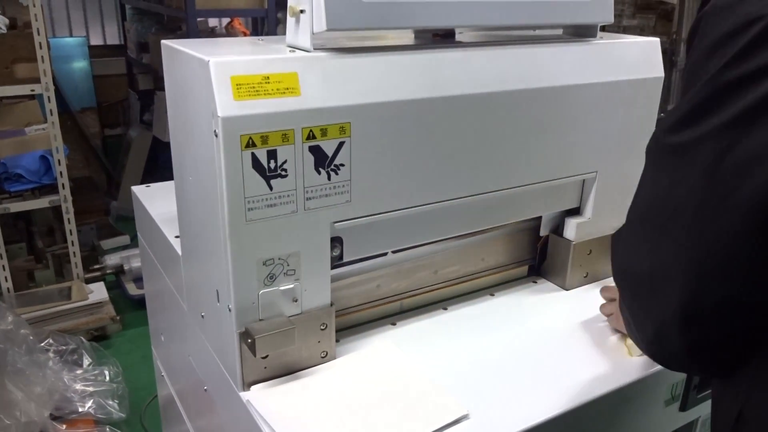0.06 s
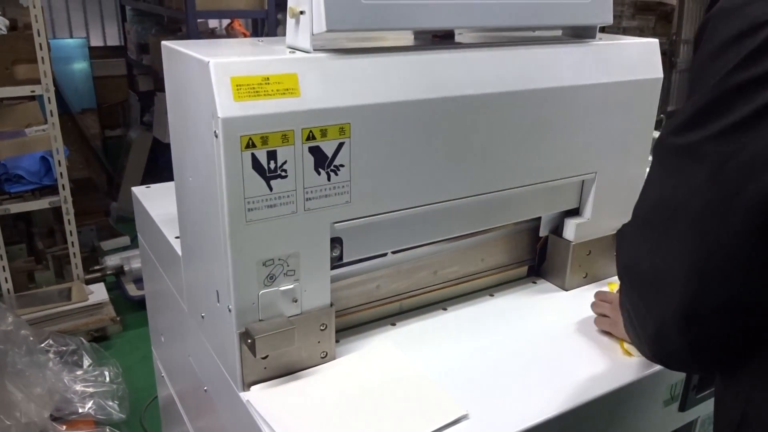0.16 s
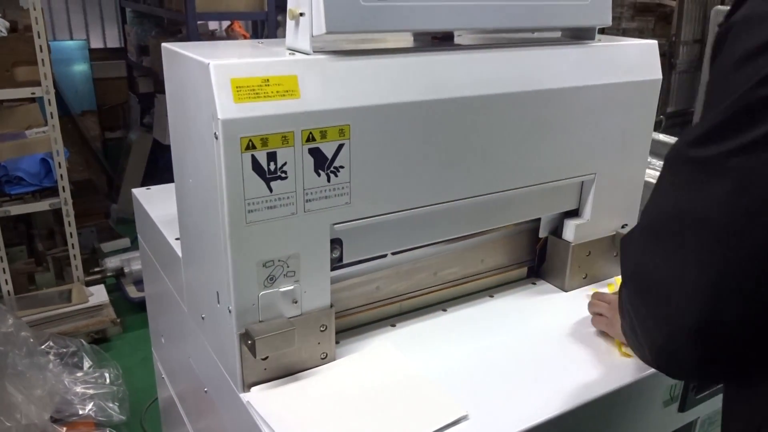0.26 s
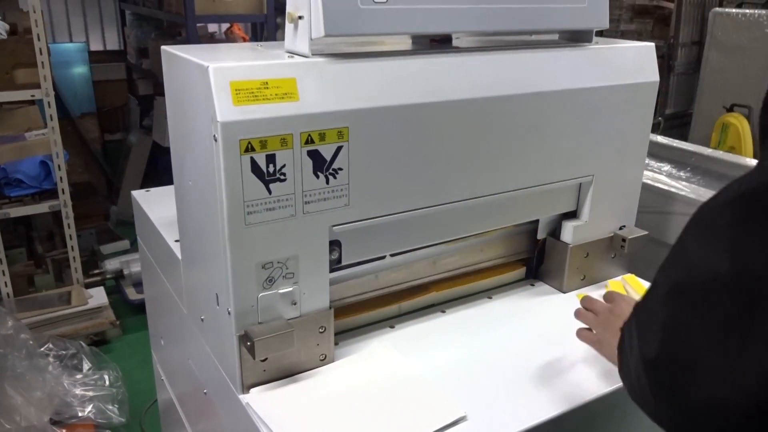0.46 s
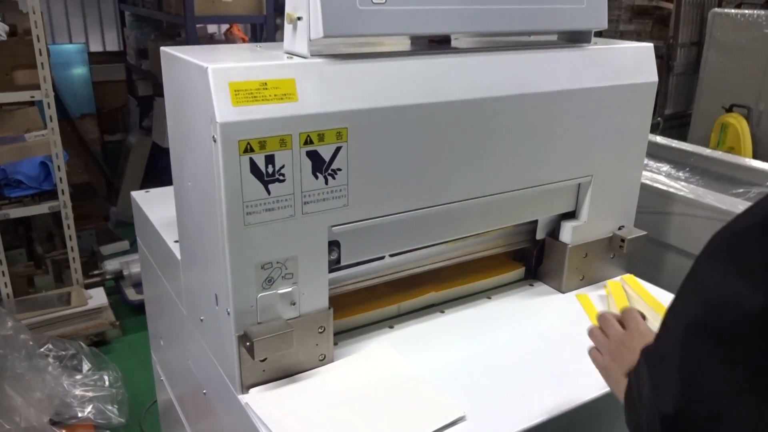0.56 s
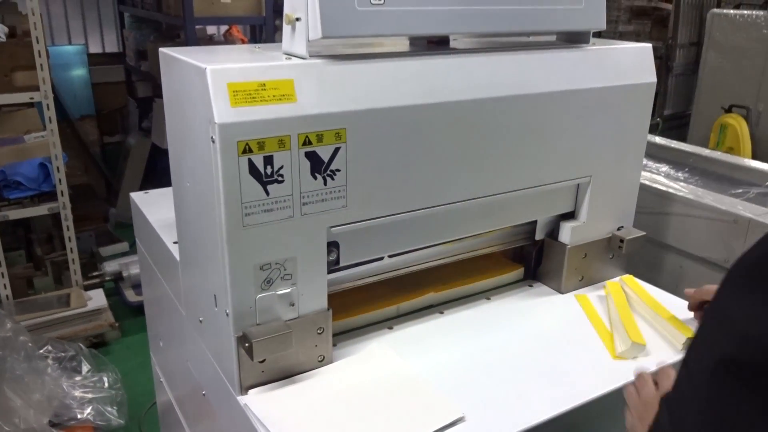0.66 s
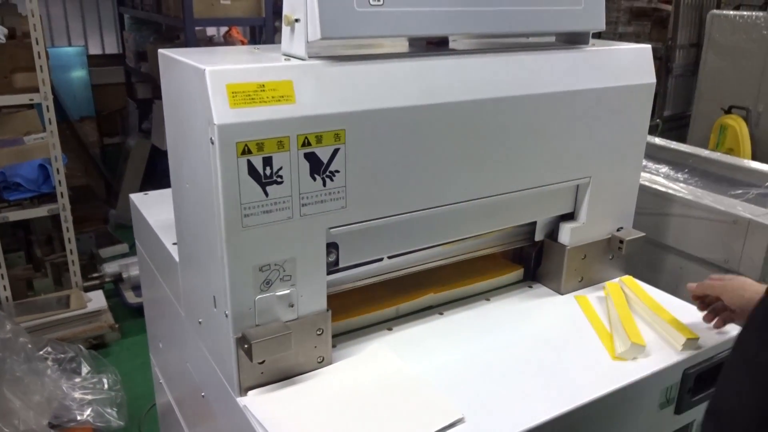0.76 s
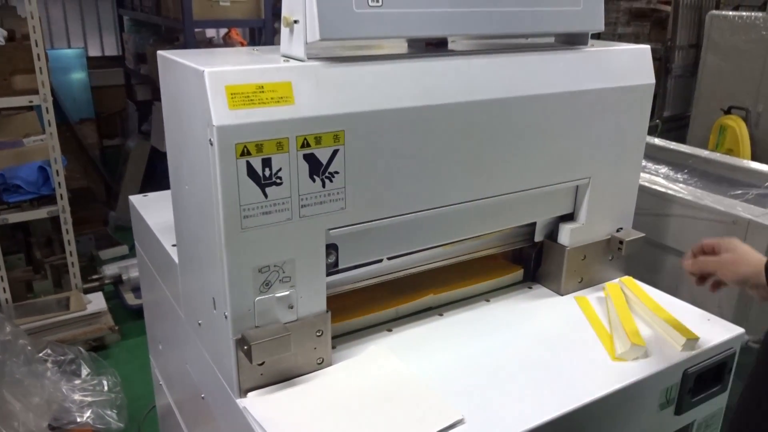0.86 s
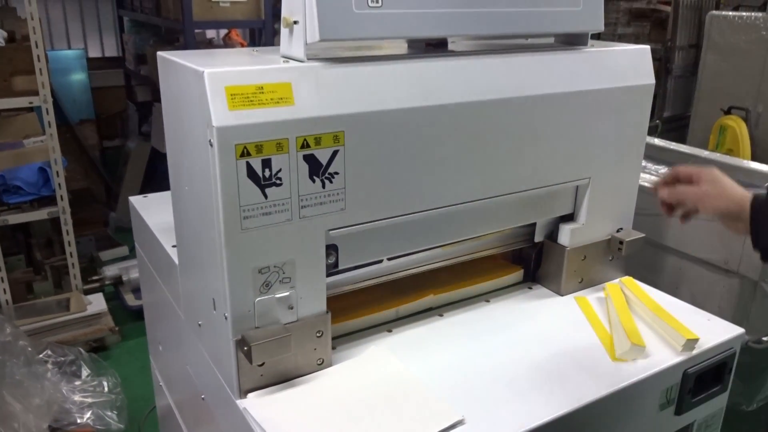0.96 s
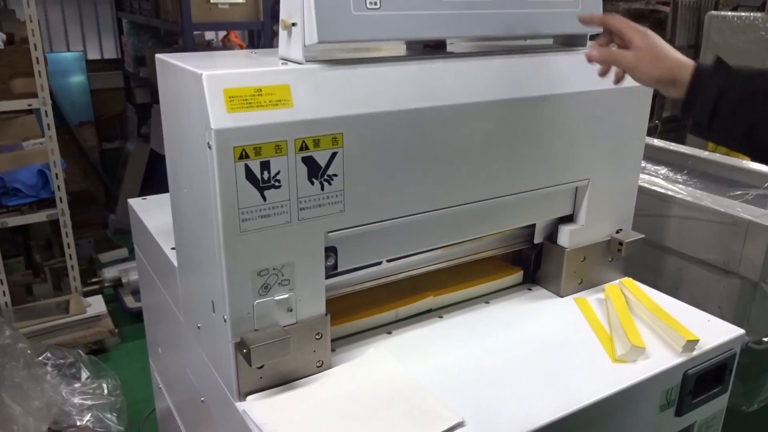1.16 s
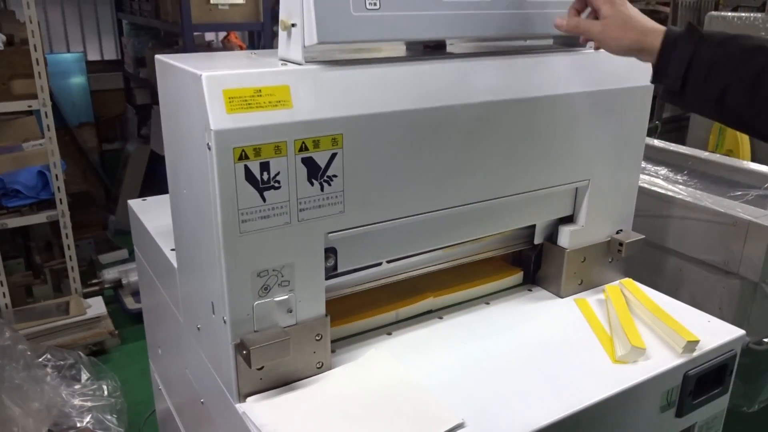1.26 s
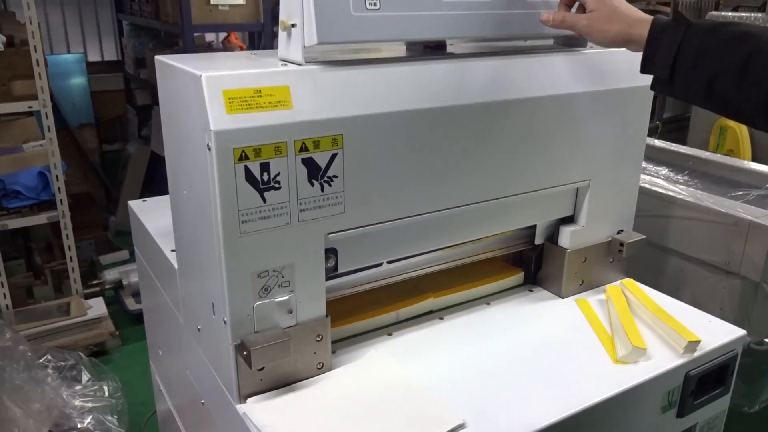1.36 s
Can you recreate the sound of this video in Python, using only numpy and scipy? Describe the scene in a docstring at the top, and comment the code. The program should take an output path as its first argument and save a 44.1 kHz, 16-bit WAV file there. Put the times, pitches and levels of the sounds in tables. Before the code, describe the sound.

Paper scraping over a steel cutter table, ending in a hard knock, a tick and light touches

```python
"""Paper hisses and rasps across the steel table of a large cutter, over the workshop's low steady rumble.
Quick second pushes follow, and the machine knocks, booms and rattles dully: pulses excite its housing.
A strip ticks down with a short ring, then a sleeve brushes by and a hand lands on the housing.
Friction is noise with dense tiny slips, light hits are decaying noise, blows are short damped sines.
A small, hard room answers with decaying noise whose treble dies sooner."""
import sys
import numpy as np
from scipy import signal
from scipy.fft import rfft, irfft
from scipy.io import wavfile

SR = 44100
rng = np.random.default_rng(int(sys.argv[2]) if len(sys.argv) > 2 else 0)


def generate_wav(signal):
    """Clip the signal to [-1, 1] and save it as 16-bit WAV at the path in sys.argv[1]."""
    frames = np.transpose(np.atleast_2d(signal))
    scaled = np.clip(frames, -1, 1) * 32767
    pcm = np.round(scaled).astype(np.int16)
    wavfile.write(sys.argv[1], SR, pcm)


N = 61739  # length [samples]


def undb(db):
    """Decibels to gain."""
    return 10 ** (np.asarray(db) / 20)


def unit(x):
    """Scale to rms 1."""
    return x / np.sqrt(np.mean(x ** 2))


def noise():
    """Two unrelated noises: what both ears share (mid) and what differs between them (side)."""
    return rng.standard_normal((2, N))


def ring(x, response):
    """Play a sound through a response by convolution."""
    return signal.fftconvolve(np.atleast_2d(x), np.atleast_2d(response), axes=1)[:, :N]


def colour(x, points):
    """Shape the spectrum through (frequency [Hz], gain [dB]) points with a causal, minimum-phase filter."""
    size = 4096
    hz, db = np.array(points, float).T
    f = np.maximum(np.arange(size // 2 + 1) * SR / size, 1)
    log_gain = np.log(undb(np.interp(np.log(f), np.log(hz), db)))
    # folding the cepstrum onto positive time makes the filter causal
    cepstrum = irfft(log_gain)
    cepstrum[1:size // 2] *= 2
    cepstrum[size // 2 + 1:] = 0
    return ring(x, irfft(np.exp(rfft(cepstrum))))


def fade(t60):
    """Exponential decay, 60 dB down after t60 seconds."""
    return np.exp(-np.log(1000) * np.arange(N) / SR / t60)


def tail(t60):
    """Dense decaying reflections of unit energy."""
    return unit(noise() * fade(t60)) / np.sqrt(N)


GRAINS_PER_S, GRAIN_SPREAD_DB = 7000, 1.5


def friction(spectrum):
    """Fibres catch and let go: dense tiny slips of uneven size over smooth noise."""
    catches = rng.random(N) < GRAINS_PER_S / SR
    slips = catches * noise() * undb(GRAIN_SPREAD_DB * rng.standard_normal(N))
    return unit(colour(unit(slips) + noise(), spectrum))


def strokes(rows, spectrum):
    """Short rubs: linear attack, hold, exponential release; overlapping rubs add in power."""
    t = np.arange(N) / SR
    power = 0
    for start, length, db, attack, release in rows:
        rise = np.clip((t - start) / attack, 0, 1)
        fall = np.exp(-np.maximum(t - start - length, 0) / release)
        power = power + (undb(db) * rise * fall) ** 2
    return np.sqrt(power) * friction(spectrum)


def contacts(rows, spectrum):
    """Hits: coloured noise that starts at once and dies exponentially."""
    t = np.arange(N) / SR
    envelope = 0
    for start, db, decay in rows:
        envelope = envelope + undb(db) * (t >= start) * np.exp(-np.maximum(t - start, 0) / decay)
    return envelope * unit(colour(noise(), spectrum))


def pulses(rows):
    """Dull blows: each sine swells to its peak at half the ring time, then dies away."""
    t = np.arange(N) / SR
    out = 0
    for start, db, hz, ring_s in rows:
        age = np.maximum(t - start, 0)
        swell = 2 * age / ring_s
        out = out + undb(db) * np.sin(2 * np.pi * hz * age) * swell * np.exp(1 - swell)
    return out


def resonate(x, modes, t60, blur_hz):
    """Modes gather the energy of the blows and let it die away; their pitch wavers slightly."""
    energy = np.maximum(ring(np.atleast_2d(x)[0] ** 2, fade(t60) ** 2), 0)
    steps = rng.standard_normal((len(modes), N))
    waver = np.cumsum(steps, axis=1) * np.sqrt(2 * np.pi * blur_hz / SR)
    t = np.arange(N) / SR
    tones = sum(undb(db) * np.sin(2 * np.pi * hz * t + w) for (hz, db), w in zip(modes, waver))
    return np.sqrt(energy / energy.max()) * tones


# tone of the workshop's rumble: (frequency [Hz], relative level [dB])
SHOP_TONE = [(20, -9.5), (45, -3), (150, -0.5), (230, -1), (400, -7.5), (650, -8), (1000, -18), (2000, -20),
             (4000, -21), (13000, -25), (16000, -31)]
SHOP_DB = -44


def workshop():
    """Steady noise, mostly low rumble with a faint hiss."""
    return undb(SHOP_DB) * unit(colour(noise(), SHOP_TONE))


# long slide, before the trims: (time [s], paper hiss [dB], paper rasp [dB], table scrape [dB])
SLIDE_LEVELS = [(0.0, -45, -48.5, -48.5), (0.082, -48.5, -56, -81), (0.132, -50.5, -65, -80),
                (0.208, -34.5, -46, -68), (0.214, -33, -41.5, -56), (0.272, -31, -36, -45),
                (0.282, -31, -30.5, -37), (0.354, -22, -27, -33), (0.41, -23, -27, -35.5),
                (0.5, -23.5, -29, -36), (0.542, -29, -33.5, -35.5), (0.578, -47, -43, -39.5),
                (0.587, -30, -44, -40)]
# tones of the paper's hiss, its rasp and the table's scrape: (frequency [Hz], relative level [dB])
HISS_TONE = [(2500, -27.5), (4000, -10.5), (5200, -4), (6500, -3.5), (9000, 1.5), (11000, -0.5),
             (13600, -1.5), (16000, -6)]
RASP_TONE = [(1200, -32), (1900, -9.5), (2200, -7.5), (3000, -6.5), (4300, -3), (5200, -7), (7000, -6),
             (12000, -54)]
SCRAPE_TONE = [(100, -21), (220, 1.5), (450, -4), (700, 1), (1600, -2), (2500, -10), (5000, -31)]
HISS_TRIM_DB, RASP_TRIM_DB, SCRAPE_TRIM_DB = -1, -.5, -1
SLIDE_RELEASE_S, SCRAPE_RELEASE_S = 0.079, 0.23  # time constants after the last row


def slide():
    """The paper hisses and rasps over the table; a lower scrape swells as the hand presses."""
    t = np.arange(N) / SR
    times, hiss_db, rasp_db, scrape_db = np.array(SLIDE_LEVELS).T
    after = np.maximum(t - times[-1], 0)
    paper_release = np.exp(-after / SLIDE_RELEASE_S)
    scrape_release = np.exp(-after / SCRAPE_RELEASE_S)
    hiss = undb(np.interp(t, times, hiss_db) + HISS_TRIM_DB) * paper_release * friction(HISS_TONE)
    rasp = undb(np.interp(t, times, rasp_db) + RASP_TRIM_DB) * paper_release * friction(RASP_TONE)
    scrape = undb(np.interp(t, times, scrape_db) + SCRAPE_TRIM_DB) * scrape_release * friction(SCRAPE_TONE)
    return hiss + rasp + scrape


# heavy frame booming when bumped or knocked: (time [s], level [dB], decay [s])
FRAME_BOOMS = [(.21, -37.5, 0.029), (.673, -25, 0.042), (.742, -27.5, 0.085)]
# tone of the booms: (frequency [Hz], relative level [dB])
BOOM_TONE = [(35, -39), (130, 4.5), (380, -0.5), (520, -8.5), (2000, -37)]
# knocks in the machine, before the low cut: (time [s], peak [dB], centre [Hz], ring [s])
MACHINE_KNOCKS = [(.6635, -8, 780, 0.0018), (.667, -15.5, 1160, 0.0016), (.672, -19, 242, 0.0076),
                  (.6765, -12.5, 750, 0.0027), (.680, -12.5, 1298, 0.0032), (.699, -21.5, 1274, 0.01),
                  (.714, -19, 383.5, 0.013), (.734, -21.5, 713, 0.005), (.741, -14.5, 214, 0.0086)]
KNOCK_LOW_CUT_HZ = 89
# loose parts clattering with the knocks: (time [s], level [dB], decay [s])
LOOSE_RATTLES = [(.665, -19.5, 0.019), (.677, -25.5, 0.075)]
# tone of the clatter: (frequency [Hz], relative level [dB])
RATTLE_TONE = [(40, -46), (150, -20.5), (350, -0.5), (700, -0.5), (1400, -2), (2100, -11.5), (4200, -13.5),
               (16000, -50)]
# modes of the housing: (frequency [Hz], level at the strongest ringing [dB])
HOUSING_MODES = [(133, -34), (221, -29.5), (305, -42), (368, -27.5), (416, -38), (639, -32.5), (700, -37),
                 (771, -39), (942, -37), (1230, -39), (1284, -43), (1393, -38.5), (1855, -39.5),
                 (1906, -38.5), (2369, -41.5), (2496, -34)]
HOUSING_T60_S, HOUSING_BLUR_HZ = .4, 5
PANEL_DB, PANEL_T60_S = -9, 0.17


def machine():
    """The frame booms; a quick run of knocks rings the housing and its panels."""
    low_cut = signal.butter(2, KNOCK_LOW_CUT_HZ, "high", fs=SR, output="sos")
    blows = signal.sosfilt(low_cut, pulses(MACHINE_KNOCKS))
    struck = blows + contacts(LOOSE_RATTLES, RATTLE_TONE) + contacts(FRAME_BOOMS, BOOM_TONE)
    housing = resonate(blows, HOUSING_MODES, HOUSING_T60_S, HOUSING_BLUR_HZ)
    panels = undb(PANEL_DB) * ring(blows, tail(PANEL_T60_S))
    return struck + housing + panels


# faint squeak in the slide: (time [s], length [s], level [dB], attack [s], release [s])
PAPER_SQUEAKS = [(.215, 0.035, -41, 0.011, 0.034)]
# narrow tone of the squeak: (frequency [Hz], relative level [dB])
SQUEAK_TONE = [(1600, -42), (2150, 1), (2400, -10), (3200, -24)]


def squeak():
    """Narrow-band friction squeaks as the paper starts to move."""
    return strokes(PAPER_SQUEAKS, SQUEAK_TONE)


# quick pushes of paper, the last row the strip sliding just before it ticks down: (time [s], length [s], level
# [dB], attack [s], release [s])
PAPER_PUSHES = [(.588, 0.019, -24.5, 0.00074, 0.01), (.598, 0.051, -21.5, 0.025, 0.008),
                (.665, 0.02, -34, 0.0085, 0.048), (.713, 0.0073, -28.5, 0.0017, 0.013),
                (.849, 0.014, -37.5, 0.0027, 0.031)]
# tone of the pushes: (frequency [Hz], relative level [dB])
PUSH_TONE = [(1300, -31), (2200, -6.5), (3730, -2.5), (4730, -3.5), (9280, -6), (11400, -9), (14100, -10),
             (16000, -20)]


def pushes():
    """Quick pushes of the paper, then the strip sliding: short bursts of bright friction."""
    return strokes(PAPER_PUSHES, PUSH_TONE)


# ticks of a settling paper strip: (time [s], level [dB], decay [s])
STRIP_TICKS = [(.8645, -21.5, 0.0023), (.8702, -28, 0.0036)]
# tone of the ticks: (frequency [Hz], relative level [dB])
TICK_TONE = [(800, -22), (2400, -14.5), (3000, 7.5), (3550, 11.5), (4600, -9), (6800, 0), (10000, -14.5),
             (16000, -32)]
CLACK_DB, CLACK_HZ, CLACK_RING_S = -21.5, 3280, 0.0014  # the strip's edge landing
# modes of the strip: (frequency [Hz], level at the strongest ringing [dB])
STRIP_MODES = [(3300, -39), (3580, -36.5), (7100, -46), (8600, -42.5), (9700, -40.5)]
STRIP_T60_S, STRIP_BLUR_HZ = 0.27, 163


def strip():
    """A strip clacks down, bounces once and leaves a short, bright ring."""
    clack = pulses([(STRIP_TICKS[0][0], CLACK_DB, CLACK_HZ, CLACK_RING_S)])
    ticks = contacts(STRIP_TICKS, TICK_TONE) + clack
    return ticks + resonate(ticks, STRIP_MODES, STRIP_T60_S, STRIP_BLUR_HZ)


# sleeve rubs: (time [s], length [s], level [dB], attack [s], release [s], cut-off [Hz])
SLEEVE_RUBS = [(1.185, 0.038, -48.5, .0016, .01, 1110), (1.219, 0.0087, -42, .002, .01, 1760),
               (1.227, .016, -46, .005, 0.037, 2720)]
CLOTH_SLOPE_DB = -26  # two octaves above the cut-off
# soft bumps of arm and hand: (time [s], peak [dB], centre [Hz], ring [s])
ARM_BUMPS = [(1.188, -40, 794, .0035), (1.222, -35, 502, 0.0043), (1.336, -32, 680, 0.0015),
             (1.337, -35, 289.6, 0.018), (1.348, -33.5, 840, 0.0033)]
# crisp snaps of the sleeve: (time [s], level [dB], decay [s])
SLEEVE_SNAPS = [(1.2503, -27, 0.0013), (1.312, -46, 0.0052)]
# tone of the snaps: (frequency [Hz], relative level [dB])
SNAP_TONE = [(4000, -11), (8500, -5), (14000, -2)]
# light touches of the hand on the housing: (time [s], level [dB], decay [s])
HAND_TAPS = [(1.3365, -35.5, 0.017), (1.347, -47.5, 0.027), (1.359, -41.5, 0.063)]
# tone of the touches: (frequency [Hz], relative level [dB])
TAP_TONE = [(150, -6), (290, -6), (750, -7.5), (1800, -9), (2400, 0.5), (3200, -6.5), (4300, -9),
            (16000, -46)]


def reach():
    """The sleeve scuffs brighter as the arm speeds up and snaps crisply; the hand lands on the housing."""
    scuffs = 0
    for *rub, hz in SLEEVE_RUBS:
        cloth_tone = [(hz / 10, CLOTH_SLOPE_DB / 2), (hz / 2, 0), (hz, 0), (hz * 4, CLOTH_SLOPE_DB)]
        scuffs = scuffs + strokes([rub], cloth_tone)
    snaps = contacts(SLEEVE_SNAPS, SNAP_TONE)
    landing = contacts(HAND_TAPS, TAP_TONE) + pulses(ARM_BUMPS)
    return scuffs + snaps + landing


# brushes of paper and fingertips: (time [s], length [s], level [dB], attack [s], release [s])
LIGHT_BRUSHES = [(1.243, 0.0044, -41.5, 0.002, 0.046), (1.34, 0.18, -49.5, 0.029, .03)]


def brushes():
    """Paper and fingertips brush lightly, with the friction tone of the paper's hiss."""
    return strokes(LIGHT_BRUSHES, HISS_TONE)


ROOM_T60_S, ROOM_TREBLE_T60_S, ROOM_SPLIT_HZ = 0.57, 0.34, 4140


def room(x):
    """The workshop's reverberation: two noise tails, the treble one dying sooner."""
    low_pass = signal.butter(2, ROOM_SPLIT_HZ, fs=SR, output="sos")
    high_pass = signal.butter(2, ROOM_SPLIT_HZ, "high", fs=SR, output="sos")
    low = ring(signal.sosfilt(low_pass, x), tail(ROOM_T60_S))
    high = ring(signal.sosfilt(high_pass, x), tail(ROOM_TREBLE_T60_S))
    return low + high


def place(x, width, pan_db=0):
    """Mid and side to left and right; the side is turned a quarter cycle so the ears differ in phase."""
    mid = x[0]
    side = signal.hilbert(colour(x[1], width)[0]).imag
    pan = undb(np.array([[pan_db], [-pan_db]]) / 2)
    return np.array([mid + side, mid - side]) * pan


# stereo width of workshop, paper, machine and echo: (frequency [Hz], gain of the side signal [dB])
SHOP_SIDE = [(60, -26), (200, -16.5), (1200, 0.5), (6000, -13)]
PAPER_SIDE = [(500, -33), (1200, -27), (2800, -23), (5600, -14.5), (11000, -10)]
MACHINE_SIDE = [(200, -42), (500, -37), (1200, -19.5)]
ECHO_SIDE = [(200, -38), (500, -13), (1200, -18), (6000, -35)]
PAPER_PAN_DB = -1.2  # left against right
PAPER_WET_DB, KNOCK_WET_DB, TICK_WET_DB = -4, -13.5, -13  # sends to the room


def scene():
    """Paper, machine and hand in the workshop."""
    rumble = workshop()
    paper = slide() + squeak() + pushes() + brushes()
    thud, ticks, hand = machine(), strip(), reach()
    paper_send = undb(PAPER_WET_DB) * (paper + hand)
    echo = room(paper_send + undb(KNOCK_WET_DB) * thud + undb(TICK_WET_DB) * ticks)
    return (place(rumble, SHOP_SIDE)
            + place(paper + hand + ticks, PAPER_SIDE, PAPER_PAN_DB)
            + place(thud, MACHINE_SIDE)
            + place(echo, ECHO_SIDE))


TOP_HZ = 15900


def record(dry):
    """A steep low-pass filter cuts the extreme treble."""
    low_pass = signal.ellip(10, .2, 80, TOP_HZ, fs=SR, output="sos")  # ripple, stop-band depth [dB]
    return signal.sosfilt(low_pass, dry)


dry = scene()
out = record(dry)
generate_wav(out)
```